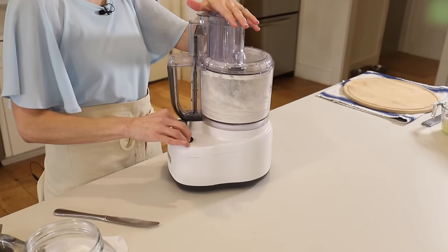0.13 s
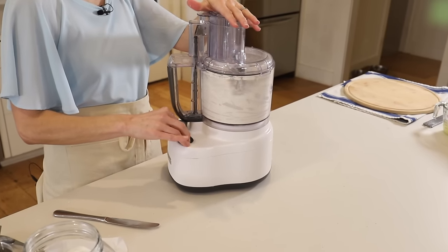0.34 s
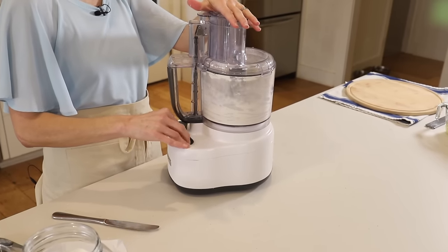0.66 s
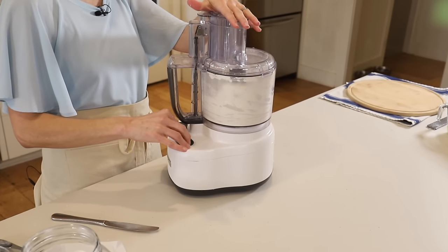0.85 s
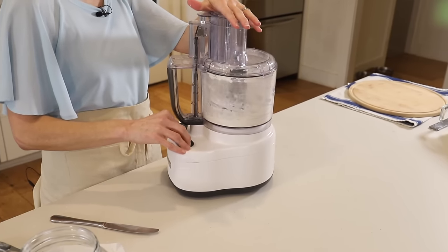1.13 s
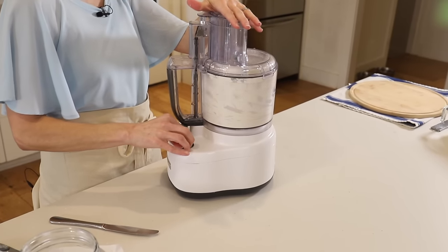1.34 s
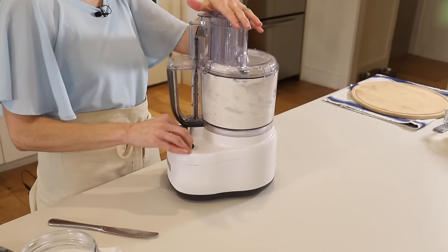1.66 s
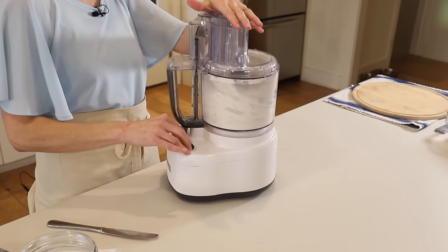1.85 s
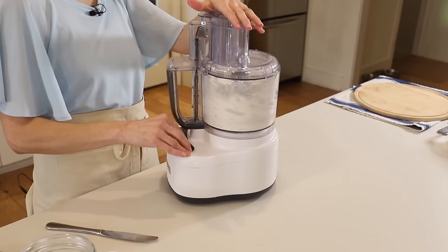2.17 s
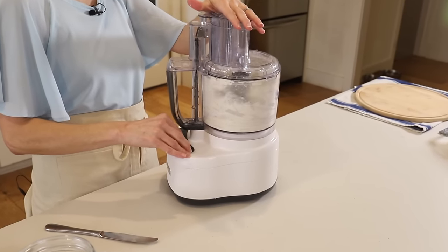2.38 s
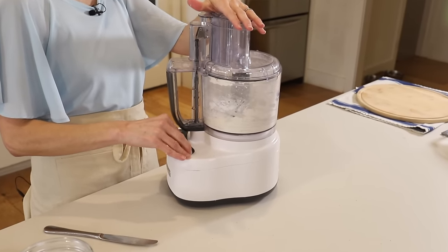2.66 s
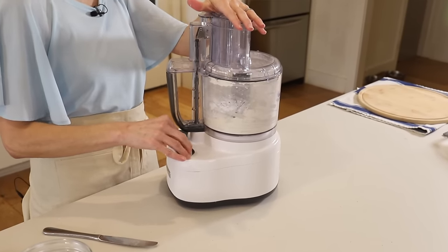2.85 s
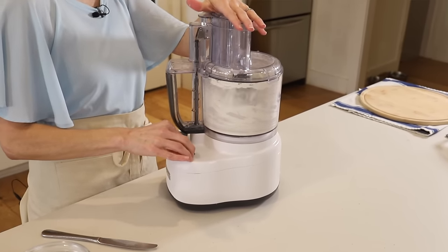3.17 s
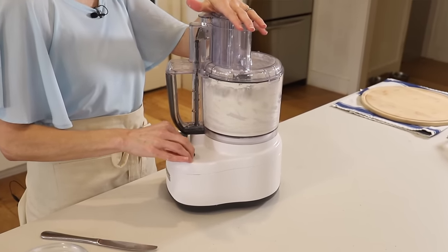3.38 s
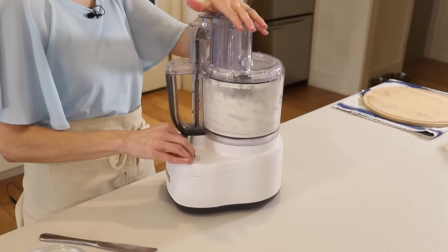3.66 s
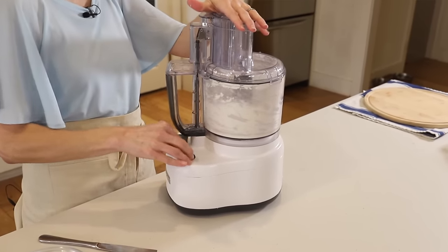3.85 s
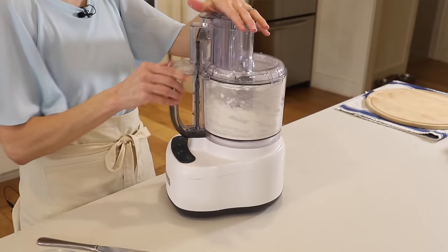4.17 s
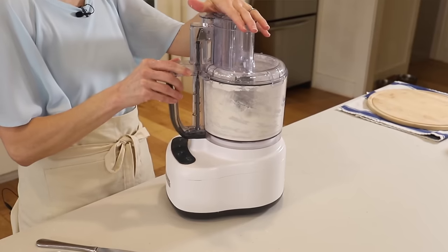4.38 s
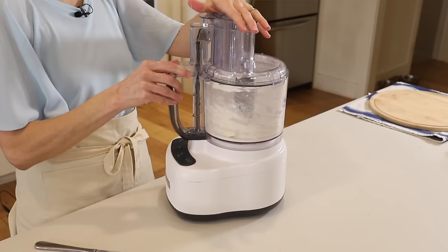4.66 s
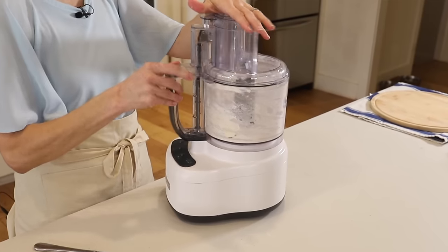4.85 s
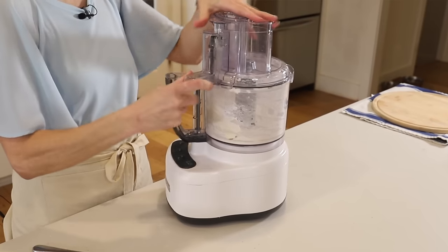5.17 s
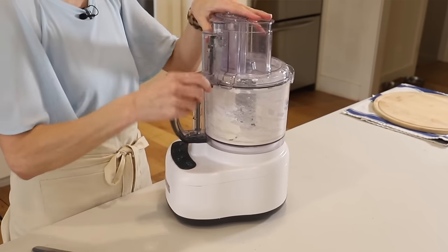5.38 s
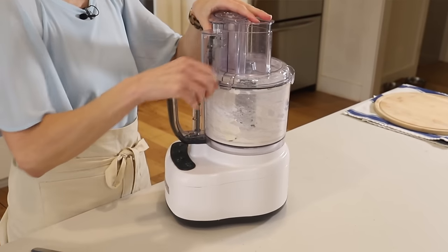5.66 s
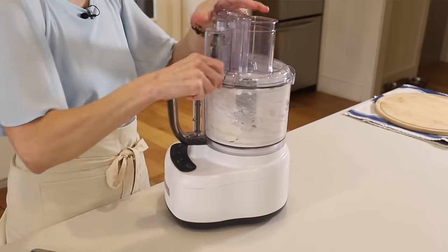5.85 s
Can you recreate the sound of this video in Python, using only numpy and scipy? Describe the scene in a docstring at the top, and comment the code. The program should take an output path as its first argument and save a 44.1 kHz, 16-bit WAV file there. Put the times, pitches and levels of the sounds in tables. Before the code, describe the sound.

Three rattling, whining bursts of a food processor cutting butter into flour, followed by plastic clicks as the lid comes off.

```python
"""Pulsing a food processor

Three pulses cut butter into flour on a kitchen counter. Each time the gears whine up, chatter
because their teeth fit loosely, and coast to a stop with brief squeals, while the blade churns and
slaps the mix against the bowl. Then the plastic lid is unlatched and lifted; its clicks ring in the room."""
import sys
import numpy as np
from scipy import signal
from scipy.fft import rfft, irfft
from scipy.io import wavfile

SR = 44100
rng = np.random.default_rng(int(sys.argv[2]) if len(sys.argv) > 2 else 0)


def generate_wav(signal):
    """Clip the signal to [-1, 1] and save it as 16-bit WAV at the path in sys.argv[1]."""
    frames = np.transpose(np.atleast_2d(signal))
    scaled = np.clip(frames, -1, 1) * 32767
    pcm = np.round(scaled).astype(np.int16)
    wavfile.write(sys.argv[1], SR, pcm)


N = 265555
TIME = np.arange(N) / SR
TEETH, TOP_HZ = 84, 3492.6  # gear teeth per turn; teeth meeting per second at top speed

# hardest slams of the loose gear teeth: t/s, relative level/dB
KNOCKS = [(.0683, -6), (.1145, -9), (.1826, -7.5), (.202, -9), (.2698, -8), (.3072, -8), (.436, -6),
          (.492, -7), (.5891, -8.5), (.6098, 0), (.636, -15), (1.297, -10.5), (1.3819, -6.5),
          (1.4588, -5.5), (1.5137, -3), (1.6135, -4), (1.715, -11), (1.74, -11), (1.759, -8), (1.822, -9.5),
          (1.884, -6), (1.9034, -6.5), (1.9454, -7), (2.0164, -7.5), (2.1555, -5), (2.1745, -8.5),
          (3.3385, -9.5), (3.5363, -11), (4.0701, -7), (4.165, -11)]
# low motor hum and its octave, then the pitches at which housing and bowl ring: f/Hz, width/Hz, boost/dB
MACHINE_PEAKS = [(86.6, 9.1, 7), (191, 23, 4.5), (383, 45, 6.5), (464, 100, 6), (659.6, 22, 5.5),
                 (883, 860, 3), (1420, 180, 9.5), (2185, 240, 12.5), (2560, 170, 0.5), (3040, 130, 6),
                 (3350, 74, -3), (4190, 71, -7.5), (4660, 140, 3.5), (7800, 100, 3)]
# pitches at which the lid rings: f/Hz, width/Hz, boost/dB
LID_RINGS = [(191, 66, 13.5), (476, 59, 5), (590, 34, 10.5), (860, 71, 1), (1717.6, 120, -0.5),
             (2410, 100, 7), (3280, 470, 3), (4490, 350, 3), (6300, 600, -3)]
# tone of snapping plastic: f/Hz, level/dB
CRACK_SPECTRUM = [(200, -30), (900, 1), (1700, 7), (3200, 2), (4500, -2), (7000, -15), (16000, -41)]


def gears(mesh_hz, rattle, whine):
    """Loose teeth rattle the housing and whine at mesh_hz, the rate they meet; knocks flare the whine."""
    # tone of the rattle: f/Hz, level/dB
    rattle_spectrum = [(200, -49), (700, -28.5), (1300, -7), (1800, -2), (2900, 1.5), (3700, 0),
                       (5000, -7.5), (7000, -24), (9000, -20.5), (11000, -33), (16000, -41)]
    # parts of the whine: multiple of mesh_hz, level at a crawl/dB, level at full speed/dB
    harmonics = [(1, 6.5, -4.5), (2, 4, -10), (3, -1, -16.5), (4, 0, -29.5)]
    # how strongly each pitch of the whine comes through: f/Hz, level/dB
    whine_spectrum = [(100, -44), (450, -11), (850, 2.5), (1400, -4), (2100, 5.5), (3500, 5.5), (4700, 0),
                      (6100, -3.5), (6550, -3.5), (7100, -5), (8500, -0.5), (9600, -27), (16000, -36.5)]
    turns = np.cumsum(mesh_hz) / SR / TEETH
    speed = mesh_hz / mesh_hz.max()
    chatter = rattle * shaft_beats(turns, slip=.3, rise_s=.0027, spread_db=9, steady=1.49)
    knocks = bursts(KNOCKS, rise_s=.0033)
    # the teeth float in their gaps: the tone smears, and breaks up as they lose contact
    slack = (.025 + .045 * speed) * wander(250) + .1 * np.sin(2 * np.pi * turns)
    contact = unit(amp((3 + 3 * speed) * np.clip(wander(45), -2, 1)))
    squeal = squeals()
    loose = 1 / (1 + squeal / amp(-28.5))  # a squeal holds the teeth together
    wobble = loose * (.03 - .02 * speed) * wander(60)
    cycles = np.cumsum(mesh_hz * (1 + wobble)) / SR + slack
    tone = np.zeros(N)
    for k, crawl_db, full_db in harmonics:
        db = crawl_db + (full_db - crawl_db) * speed + look_up(whine_spectrum, k * mesh_hz)
        tone += amp(db + 2.57 * wander(44)) * np.sin(2 * np.pi * k * cycles)
    blows = np.hypot(amp(-8.5) * knocks, amp(-4.5) * squeal)  # hypot adds two strengths by power
    clatter = colour(np.hypot(amp(-2.5) * chatter, blows) * noise(), rattle_spectrum, MACHINE_PEAKS)
    # near top speed a thin, clean whistle sings an octave above mesh_hz
    whistle = rattle * amp(-21 - 600 * (1 - speed) ** 2) * np.sin(4 * np.pi * np.cumsum(mesh_hz) / SR)
    singing = np.hypot(contact * chatter * whine, np.sqrt(contact) * squeal)
    return clatter + whistle + np.hypot(singing, amp(-11.5) * knocks) * tone


def squeals(rise_s=.0067, fall_s=.02):
    """Strength of the squeals, when the teeth stay in touch for a moment and sing out."""
    # squeals: t/s, length/s, relative level/dB
    moments = [(0.013, 0.051, -23), (0.661, .04, -23.5), (0.914, 0.054, -19.5), (0.966, 0.058, -26.5),
               (1.289, 0.12, -22), (2.053, 0.035, -22.5), (2.253, 0.08, -20.5), (2.345, 0.038, -21),
               (3.015, 0.075, -21), (3.2, .08, -22.5), (4.517, 0.025, -23.5), (4.586, 0.037, -28.5)]
    return sum(amp(db) * np.clip((TIME - s) / rise_s, 0, 1)
               * np.clip((s + length - TIME) / fall_s + .5, 0, 1) for s, length, db in moments)


def blade(mesh_hz, churn, hiss):
    """Two knives sweep the mix round the bowl, flinging lumps and a spray of flour at its wall."""
    # big lumps of butter hitting the bowl: t/s, relative level/dB
    lumps = [(.045, -8.5), (.266, -9.5), (.357, -15), (.431, -10), (.537, -11.5), (.757, -6.5), (.782, -8),
             (.902, -10), (1.283, -8), (1.656, -6.5), (1.755, -13), (1.886, -9), (1.947, -10),
             (3.002, -8.5), (3.564, -9.5), (4.127, -7.5), (4.264, -13.5)]
    # tone of the churning mix: f/Hz, level/dB
    churn_spectrum = [(25, -45), (44, -42), (62, -15.5), (78, -18.5), (115, -13), (170, -5.5), (300, -4.5),
                      (400, -1.5), (560, -2.5), (950, 1), (1300, -9.5), (2000, -9.5), (5000, -45.5)]
    # tone of the flour spray: f/Hz, level/dB
    flour_spectrum = [(1500, -26.5), (4000, 0.5), (6000, 3.5), (8700, 0), (9800, -10.5), (12000, -15),
                      (16000, -23)]
    turns = np.cumsum(mesh_hz) / SR / TEETH
    sweeps = shaft_beats(turns, slip=.25, rise_s=.0028, spread_db=-5, steady=.98)
    slaps = np.hypot(amp(-1.5) * churn * sweeps, amp(-6.5) * bursts(lumps, rise_s=.008, early_s=.002))
    crumbs = unit(noise() * amp(3.1 * np.clip(noise(), -2, 2)))  # many fine hits, a few larger
    spray = np.hypot(hiss * amp(-1.5 + 1.8 * wander(90)), amp(-29.5) * bursts(KNOCKS, rise_s=.008))
    butter = colour(slaps * noise(), churn_spectrum, MACHINE_PEAKS)
    return butter + colour(spray * crumbs, flour_spectrum, MACHINE_PEAKS)


def motor(knee=1.7, jolt_db=3.5, jolt_s=.064):
    """Each press spins the motor up, then it coasts; speed and load set how loud gears and mix are."""
    # button presses: t/s, held/s, coasting/s, spin-up/s, drag of the mix, gear level/dB, mix level/dB
    presses = [(-.17, .595, .71, .125, .2, -0.2, .5), (1.266, .674, .605, .122, .06, 0.5, 0.7),
               (2.985, .935, .835, .136, .28, 2, 0)]
    # the blade runs clear of the mix or bites into it: middle t/s, half length/s, change/dB
    load_swings = [(0.86, 0.023, -2), (1.425, 0.055, -3), (1.852, 0.024, -4.5), (3.227, 0.04, 2),
                   (4.248, 0.1, 1.5), (4.418, 0.041, 3), (4.491, 0.029, -2)]
    mesh_hz, gear_gain, mix_gain, jolt = np.zeros((4, N))
    for on, held, coast, spin_up, drag, gear_db, mix_db in presses:
        powered = np.clip(TIME - on, 0, held)
        slowing = np.clip((TIME - on - held) / coast, 0, 1)
        rise = powered / (powered ** knee + spin_up ** knee) ** (1 / knee)  # climbs, then levels off
        mesh_hz += TOP_HZ * rise * (1 - slowing) * np.exp(-drag * slowing)
        turning = (powered > 0) & (slowing < 1)
        gear_gain += turning * amp(gear_db)
        mix_gain += turning * amp(mix_db)
        jolt += turning * np.exp(-powered / jolt_s)  # starting shakes the gears harder
    swing_db = sum(db * np.exp(-((TIME - s) / half) ** 2) for s, half, db in load_swings)
    rattle = gear_gain * by_speed(mesh_hz, power=.16, fade_hz=408, steepness=2.5)
    rattle *= amp(-21 + jolt_db * jolt + swing_db)
    churn = mix_gain * by_speed(mesh_hz, power=.11, fade_hz=997.5, steepness=1.27)
    churn *= amp(-21 + .52 * wander(7) + swing_db)
    hiss = amp(-34) * gear_gain * by_speed(mesh_hz, power=.39, fade_hz=517, steepness=2)
    crawling = 1 / (1 + (mesh_hz / 750) ** 3)
    whine = amp(-13.5 * (1 - crawling))  # stands out from the rattle at low speed
    return mesh_hz, rattle, churn, hiss, whine


def clicks(flex_s=.0072, snap_s=.0027, rattle_s=.022, ring_cycles=5):
    """Plastic bends, snaps past its catch and rattles briefly; the struck part rings."""
    # button, latch and lid: t/s, relative level/dB, hollow body/dB, bright edge/dB, ring f/Hz
    hits = [(1.256, -32, -13.5, -6, 502), (1.271, -15, -23, -4.5, 816), (2.978, -32, -6, -19, 624),
            (2.99, -17.5, -2, -3, 997.4), (4.774, -26, -12, -11, 545), (4.881, -23, 2, -15, 452),
            (4.896, -1.5, -6, -3, 452), (4.917, 5.5, -14, -25, 2500), (4.951, -11, 2, 1.5, 894),
            (4.973, -12, -3, -21, 1450), (4.993, -5.5, -4, -8.5, 492), (5.122, -22, 0, -8, 500),
            (5.252, -28, 7, -6, 570), (5.313, -21.5, -25, -31, 598), (5.377, -17, 1, -17, 565),
            (5.412, -14.5, -6, -27, 2260), (5.455, -23, -24, -12, 564), (5.543, -10, -4.5, -28, 3470),
            (5.554, -24.5, 3, -27, 2460), (5.588, -18.5, 6.5, -14, 590), (5.761, -25.5, 2, -9.5, 550),
            (5.792, -18.5, -1.5, -35, 1310), (5.893, -32.5, 9, -22, 192), (5.907, -24, -17, -23, 1040),
            (5.943, -21.5, -15, -13, 667), (5.971, -2.5, -10.5, -6, 3300)]
    # tone of a click's hollow body: f/Hz, level/dB
    body_spectrum = [(40, -13), (120, -13), (200, -9), (500, 5.5), (900, 4.5), (1500, -35), (4000, -51)]
    # tone of its bright edge: f/Hz, level/dB
    edge_spectrum = [(1000, -47), (3500, -7), (5500, 9.5), (8000, 0), (10500, -8), (16000, -20)]
    body, crack, edge, ring = np.zeros((4, N))
    for s, db, body_db, edge_db, hz in hits:
        span = slice(round(s * SR) - SR // 100, round(s * SR) + SR // 8)
        t = np.maximum(TIME[span] - s, 0)
        swell = amp(db) * (1 - np.exp(-t / .0009))
        snap = swell * (np.exp(-t / snap_s) + amp(-23) * np.exp(-t / rattle_s))
        flex = amp(db - 20) * np.exp(-((TIME[span] - s) / flex_s) ** 2)
        body[span] += amp(body_db) * (snap + flex)
        crack[span] += snap
        edge[span] += amp(edge_db) * snap
        ring[span] += amp(-11) * swell * np.exp(-t * hz / ring_cycles) * np.sin(2 * np.pi * hz * t)
    return (ring + amp(-6) * colour(body * noise(), body_spectrum, LID_RINGS)
            + amp(-5.5) * colour(crack * noise(), CRACK_SPECTRUM, LID_RINGS)
            + amp(-3.5) * colour(edge * noise(), edge_spectrum, LID_RINGS))


def lid_rubbing(ticks_per_s=45):
    """The lid scuffs and ticks unevenly as it is twisted off."""
    # hands and lid sliding on the bowl: t/s, relative level/dB
    sliding = [(5.1, -42), (5.56, -53), (5.812, -49.5), (6.02, -32.5)]
    # tone of the rubbing: f/Hz, level/dB
    rub_spectrum = [(30, -7), (70, 3), (200, 5), (320, 8), (650, 8), (1400, 1), (3300, -7), (7000, -15),
                    (16000, -29)]
    times, levels_db = np.transpose(sliding)
    touch = np.clip((TIME - times[0]) / .13, 0, 1) * amp(np.interp(TIME, times, levels_db))
    ticks = unit(noise() * (rng.random(N) < ticks_per_s / SR))
    scuffs = colour(touch * amp(-1.5 + 3.4 * wander(54)) * noise(), rub_spectrum)
    return scuffs + amp(-8) * colour(touch * ticks, CRACK_SPECTRUM, LID_RINGS)


def kitchen(x, tail_db=-8.5, early_db=-25, early_s=.031, gap=20):
    """Adds quick echoes off counter and cupboards, and a tail that fades at its own rate at each pitch."""
    # how long the room rings: f/Hz, time to fade by 60 dB/s
    fade_times = [(100, 0.9), (500, 0.55), (1400, 0.77), (2200, 0.66), (3200, 0.62), (6000, 0.57),
                  (10000, 0.61), (16000, 0.94)]
    at = np.arange(SR // 300, SR - gap, gap)
    echoes = np.zeros(SR)
    echoes[at + rng.integers(0, gap, len(at))] = rng.choice([-1, 1], len(at))
    hz, t, bands = signal.stft(echoes, SR, nperseg=256)
    fade = amp(-60 * t / look_up(fade_times, hz)[:, None])
    tail = signal.istft(bands * fade, SR, nperseg=256)[1][:SR]
    early = np.roll(echoes[::-1], SR // 600) * np.exp(-TIME[:SR] / early_s)
    room = amp(tail_db) * tail / np.linalg.norm(tail) + amp(early_db) * early / np.linalg.norm(early)
    return x + signal.oaconvolve(x, room)[:N]


def background(hum_hz=60):
    """Mains hum and quiet room noise."""
    # tone of the room noise: f/Hz, level/dB
    room_spectrum = [(25, -13.5), (65, -4), (150, 2), (450, -1), (1500, -12.5), (8000, -23), (16000, -23)]
    return amp(-64) * np.sin(2 * np.pi * hum_hz * TIME) + amp(-55.5) * colour(noise(), room_spectrum)


def by_speed(mesh_hz, power, fade_hz, steepness):
    """A gain that grows gently with speed and drops away as the shaft slows to a crawl."""
    hz = np.maximum(mesh_hz, 1)
    return (hz / TOP_HZ) ** power / np.sqrt(1 + (fade_hz / hz) ** (2 * steepness))


def shaft_beats(turns, slip, rise_s, spread_db, steady):
    """Strength of uneven blows, about two per turn of the shaft, on top of a steady level."""
    at = np.flatnonzero(np.diff(np.floor(2 * turns + slip * wander(40))) > 0)
    size_db = spread_db * np.clip(noise()[at], -2, 1.2)
    return unit(steady + bursts(zip(at / SR, size_db), rise_s))


def bursts(rows, rise_s, early_s=0):
    """Strength over time of blows that each swell and die away."""
    envelope = np.zeros(N)
    for s, db in rows:
        part = envelope[max(round((s - early_s) * SR), 0):][:SR // 10]
        age = np.arange(len(part)) / SR / rise_s
        part += amp(db) * (age * np.exp(1 - age)) ** 2
    return envelope


def colour(x, spectrum, peaks=(), size=4096):
    """Gives x a broad tone with narrow peaks on top; white noise keeps its power."""
    hz = abs(np.fft.fftfreq(size, 1 / SR))
    db = look_up(spectrum, hz) + sum(boost / (1 + (2 * (hz - f) / width) ** 2) for f, width, boost in peaks)
    response = np.exp(np.conj(signal.hilbert(np.log(amp(db)))))  # rings after a hit, never before
    ring = np.fft.ifft(response).real[:size // 2]
    return signal.oaconvolve(x, ring / np.linalg.norm(ring))[:N]


def look_up(points, hz):
    """A table's value at hz, on a log-frequency scale."""
    f, value = np.transpose(points)
    return np.interp(np.log(hz + 1), np.log(f + 1), value)


def wander(hz):
    """A random drift that changes up to about hz times a second."""
    return unit(irfft(rfft(noise()) / (1 + (np.fft.rfftfreq(N, 1 / SR) / hz) ** 4), N))


def noise():
    """White noise."""
    return rng.standard_normal(N)


def unit(x):
    """Scales x to an average power of 1."""
    return x / np.sqrt(np.mean(x ** 2) + 1e-20)


def amp(db):
    """Decibels to gain."""
    return 10 ** (np.asarray(db) / 20)


def scene():
    """Machine and lid in the kitchen, over the quiet background."""
    mesh_hz, rattle, churn, hiss, whine = motor()
    machine = gears(mesh_hz, rattle, whine) + blade(mesh_hz, churn, hiss)
    return (kitchen(machine + clicks() + lid_rubbing()) + background())[None]


def record(dry, cutoff_hz=16100):
    """Rounds off the tallest peaks, then cuts the highest treble."""
    limited = dry / (1 + dry ** 4) ** (1 / 4)
    low_pass = signal.firwin(401, cutoff_hz, window=("kaiser", 9), fs=SR)
    return signal.oaconvolve(limited, low_pass[None], "same")


dry = scene()
out = record(dry)
generate_wav(out)
```